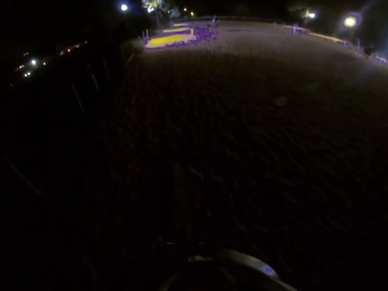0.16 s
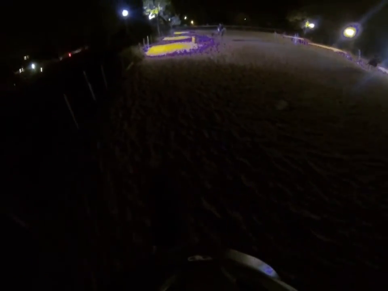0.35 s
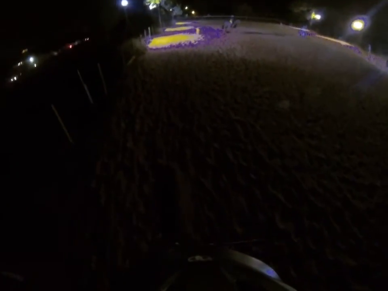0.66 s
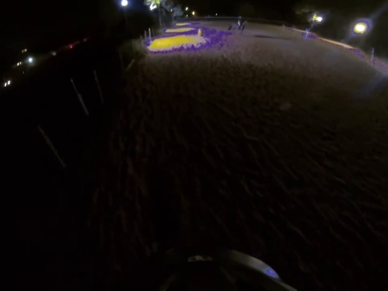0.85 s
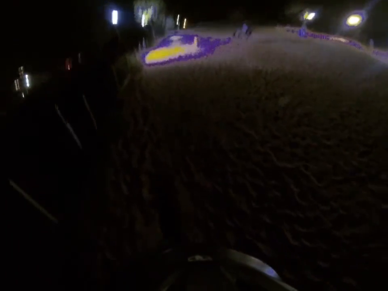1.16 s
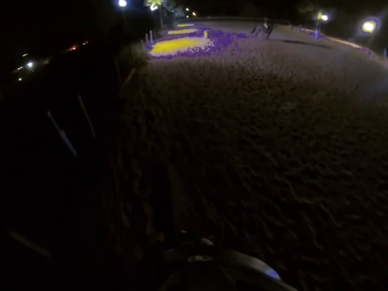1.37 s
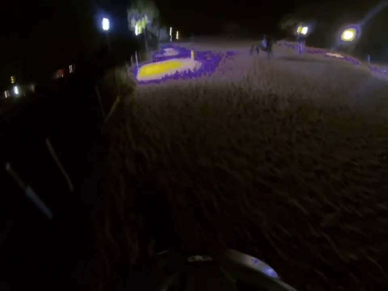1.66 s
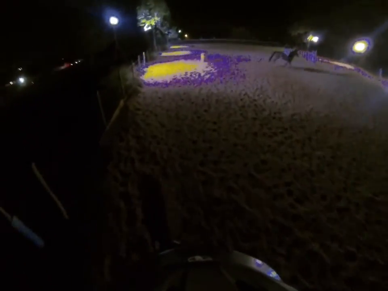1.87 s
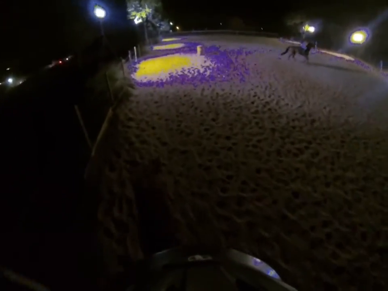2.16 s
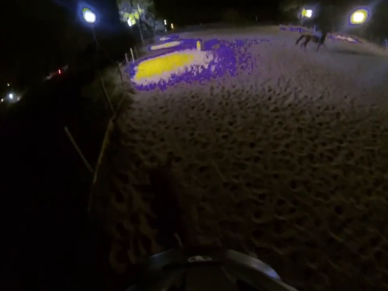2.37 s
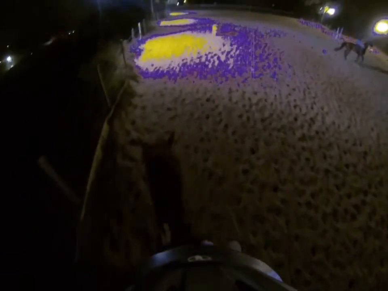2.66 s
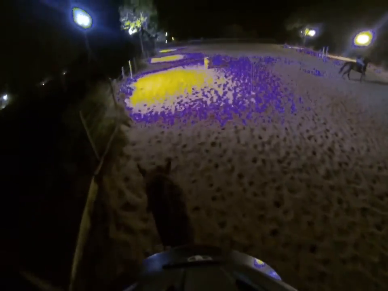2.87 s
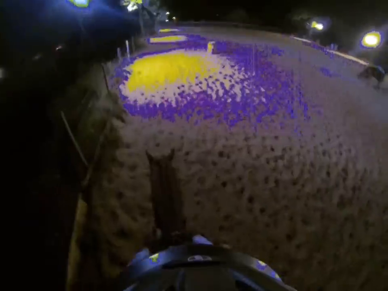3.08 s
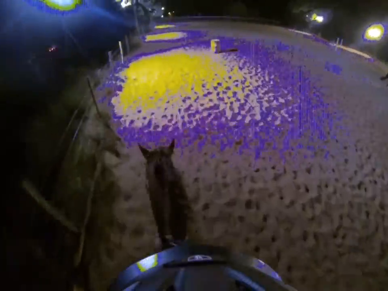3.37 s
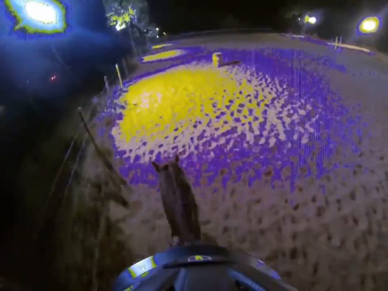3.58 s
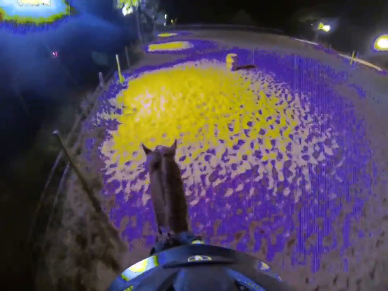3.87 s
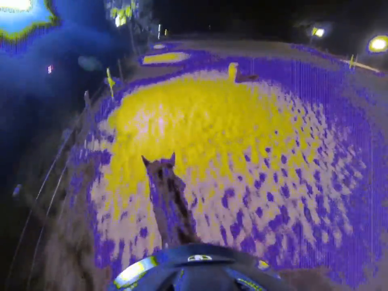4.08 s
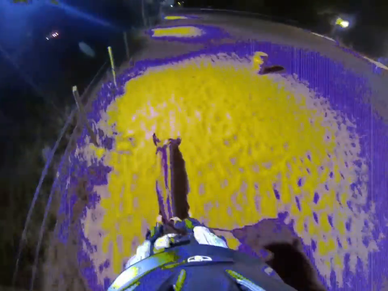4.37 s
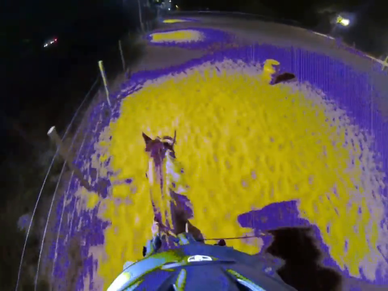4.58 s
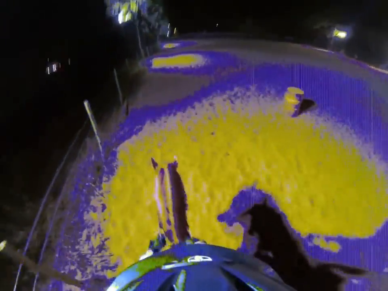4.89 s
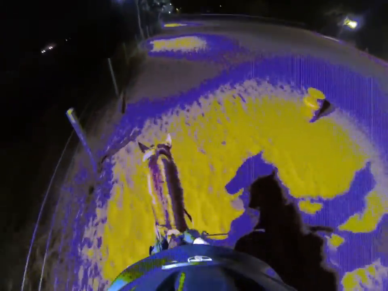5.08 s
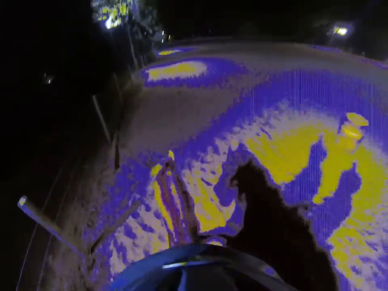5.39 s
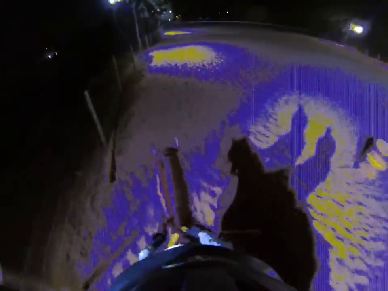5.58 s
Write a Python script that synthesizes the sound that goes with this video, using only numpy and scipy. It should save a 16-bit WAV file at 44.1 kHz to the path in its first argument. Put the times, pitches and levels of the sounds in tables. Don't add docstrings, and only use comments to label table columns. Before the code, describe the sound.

Deep muffled thumps of a horse's strides jolt a helmet-mounted camera housing, over low hiss, dull rubbing and a few tiny tack ticks.

```python
import sys
import numpy as np
from scipy import signal
from scipy.fft import rfft, irfft
from scipy.io import wavfile
from scipy.ndimage import uniform_filter1d

SR = 44100
rng = np.random.default_rng(int(sys.argv[2]) if len(sys.argv) > 2 else 0)


def voltage_ratio(decibels):
    exponent = np.asarray(decibels, float) / 20
    return 10 ** exponent


def put_to_file(sound):
    columns = np.atleast_2d(sound).T
    safe = np.clip(columns, -1, 1)
    whole_steps = np.round(safe * 32767)
    wavfile.write(sys.argv[1], SR, whole_steps.astype(np.int16))


N = 253134
T = np.arange(N) / SR

# peak_s, peak_db, push_ms, sharp_edge_db, rebound_db (last two relative)
LANDINGS = [
    (0.357, -.9, 7.8, -23, -15.5),
    (.9666, -2.4, 8.3, -36, -18),
    (2.2014, -2.0, 7.6, -24, -15.5),
    (2.8545, -8.5, 8.5, -20, -24),
    (3.409, -5.8, 8, -17, -15.5),
    (4.633, -2.5, 7.8, -18, -15.5),
    (5.2433, -2.8, 7.5, -14, -15.5),
    (1.575, -.6, 7.13, -22, -17),
    (4.0243, 4.8, 5.8, -26, -17),
]
# peak_s, peak_db, push_ms, direction (+1 or -1)
NODS = [(0.527, -24, 12.5, 1), (1.141, -17.5, 11, 1), (1.4, -23.5, 8.8, -1), (1.73, -21, 11.4, 1),
        (2.128, -19.5, 6.3, -1), (2.318, -15.5, 10.1, -1), (2.786, -14, 8.7, 1), (2.8, -13, 8.2, -1),
        (2.926, -12, 8.5, -1), (3.078, -17, 9.3, -1), (3.372, -20.5, 8.8, -1), (3.487, -13, 9.8, 1),
        (3.978, -18.5, 6.7, 1), (4.182, -21, 10.8, 1), (4.695, -20.5, 7.2, -1), (4.782, -14.5, 9.8, -1),
        (5.191, -18, 8.3, 1), (5.286, -9.5, 9.1, -1)]
# peak_s, peak_db, push_ms
HARD_STOP = (4.0243, -11, 1.45)
# pitch_hz, t60_s, share (the shell moves against the arm)
MOUNT_MODES = [
    (42.44, 0.23, 0.98),
    (20, 0.15, 0.13),
    (57.2, 0.027, -1.98),
]
# start_s, peak_db, pitch_hz, upper_partial_db
TICKS = [(1.3807, -42.5, 2500, -15), (1.6004, -48, 2170, -9), (1.6074, -52, 2150, -14),
         (2.1156, -41.5, 2540, -12), (2.126, -49, 2560, -13), (2.3565, -39, 2850, -13),
         (2.3654, -48, 2580, -11), (2.7798, -44.5, 2460, -6), (2.786, -47, 2420, 1), (2.792, -48, 2450, -3),
         (3.3634, -46, 2310, -13), (3.3687, -40, 2310, -13), (3.9575, -49, 2300, -17),
         (3.97, -51, 2530, -12), (4.6159, -43, 2470, -14), (4.6274, -49, 2720, -11),
         (4.8489, -42, 1970, -22), (5.1704, -53, 2350, -20), (5.1745, -37, 2330, -21)]
# start_s, peak_db, pitch_hz, second_mode_hz
THUDS = [
    (.345, -52, 460, 995),
    (.865, -52, 254, 500),
    (2.09, -48, 246, 465),
    (2.192, -44, 1010, 440),
    (2.7, -48, 270, 482),
    (2.895, -49, 940, 1610),
    (2.955, -49, 940, 1620),
    (3.93, -46.5, 270, 450),
    (4.62, -51, 492, 1050),
    (5.225, -49, 310, 717),
]
# strongest_s, rub_db, hum_db, sway_db
SLIPS = [(0.0, -62, -58, -41.5), (0.358, -59, -46.5, -38), (.64, -65, -68, -40.5), (.97, -57.5, -56, -37),
         (1.57, -58, -48, -29.5), (1.83, -70, -56, -35), (2.2, -56, -53.5, -27), (2.8, -59.5, -54.5, -28),
         (2.9, -55, -53.5, -34), (3.4, -56, -50.5, -29), (4.0, -59, -51.5, -34), (4.462, -67, -64, -36),
         (4.63, -56.5, -51.5, -31), (5.27, -61, -51, -31.5), (5.67, -67, -68, -54)]
# pitch_hz, width_hz, level_db
RUB_MODES = [
    (1033.4, 67, -1),
    (724, 120, -6.5),
    (1470, 345, -8.5),
    (2170, 275, -8),
]
# pitch_hz, width_hz, level_db
HUM_MODES = [
    (270, 55, 2),
    (446, 93, -3),
    (142, 63, 2.5),
]
# pitch_hz, level_db (per Hz)
HISS_COLOUR = [(30, -21.5), (60, 14), (110, 9), (200, 1.5), (500, -3), (1300, -4.5), (2500, -7),
               (5500, -12), (8000, -15.5), (12000, -22), (14000, -24), (15200, -30), (15700, -43.5)]
# pitch_hz, level_db, on_frame, off_frame (both as a fraction of the frame, 0-1)
WHINE = [
    (6480, -68, 0.32, 0.73),
    (12912, -69, 0.24, .67),
]
# start_s, cut_db, fall_ms
GAIN_CUTS = [
    (.376, 1.6, .5),
    (1.592, 2.8, .44),
    (4.024, 5.6, .45),
    (4.041, .45, .05),
    (4.0535, .65, .05),
    (5.2612, .25, .4),
]
BASS_LIMITS_DB = (-32, -16, -7)


def unit(x):
    return x / np.sqrt(np.mean(x ** 2))


def band(x, hz, width):
    return signal.lfilter(*signal.iirpeak(hz, hz / width, SR), x)


def narrow(x, hz, width):
    return band(band(x, hz, width), hz, 2 * width)


def walk(rate):
    hold = int(SR / rate)
    levels = np.repeat(rng.standard_normal(N // 200), hold)[:N]
    return unit(uniform_filter1d(uniform_filter1d(levels, hold), hold))


def add(out, s, x):
    i = int(s * SR)
    out[i:i + len(x)] += x[:N - i]


def shake(push_ms):
    t = T[:SR // 2]
    ring = np.zeros(len(t))
    for hz, t60, share in MOUNT_MODES:
        ring += share * np.exp(-np.log(1000) * t / t60) * np.sin(2 * np.pi * hz * t)
    push = np.exp(-0.5 * ((t[:SR // 10] - 1 / 20) * 1000 / push_ms) ** 2)
    moved = signal.fftconvolve(push, ring)
    low_cut = signal.butter(2, 10.7, "hp", fs=SR, output="sos")
    moved = signal.sosfilt(low_cut, moved)
    return moved / np.abs(moved).max()


def jolts():
    edge_ms, rebound_s, rebound_ms = 3, 0.0576, 10.8
    lead_s = 1 / 20
    out = np.zeros(N)
    for s, db, ms, edge_db, rebound_db in LANDINGS:
        add(out, s - lead_s, voltage_ratio(db) * shake(ms))
        add(out, s - lead_s, voltage_ratio(db + edge_db) * shake(edge_ms))
        add(out, s + rebound_s - lead_s, voltage_ratio(db + rebound_db) * shake(rebound_ms))
    for s, db, ms, direction in NODS:
        add(out, s - lead_s, direction * voltage_ratio(db) * shake(ms))
    stop_s, stop_db, stop_ms = HARD_STOP
    return out + voltage_ratio(stop_db) * np.exp(-0.5 * ((T - stop_s) * 1000 / stop_ms) ** 2)


def strike(hz, upper_hz, upper_db, t60):
    t = T[:SR // 5]
    scrape, phases = rng.standard_normal(len(t)), rng.random(4)
    modes = [(hz, 1), (0.87 * hz, 0.42), (1.13 * hz, 0.2), (upper_hz, voltage_ratio(upper_db))]
    ring = np.zeros(len(t))
    for (f, share), phase in zip(modes, phases):
        rough = 0.45 * unit(narrow(scrape, f, 0.14 * f))
        ring += share * (np.sin(2 * np.pi * (f * t + phase)) + rough)
    ring *= (1 - np.exp(-t / (0.059 * t60))) * np.exp(-np.log(1000) * t / t60)
    return ring / np.abs(ring).max()


def tack():
    out = np.zeros(N)
    trim_db, early_s = 0.66, 0.001
    for s, db, hz, upper_db in TICKS:
        add(out, s - early_s, voltage_ratio(db + trim_db) * strike(hz, 4850, upper_db, t60=0.024))
    for s, db, hz, second_hz in THUDS:
        t60 = 0.12 * (260 / hz) ** 0.65
        add(out, s - early_s, voltage_ratio(db + trim_db) * strike(hz, second_hz, -10.5, t60))
    return out


def slips(peak_db, rest_db, rise_db_s, fade_db_s, wobble_db, lag_s=0):
    since = T - np.array(SLIPS)[:, :1] - lag_s
    ramps = voltage_ratio(peak_db[:, None] + np.where(since < 0, rise_db_s * since, -fade_db_s * since))
    rest = voltage_ratio(rest_db + wobble_db * walk(14))
    return np.sqrt(rest ** 2 + np.sum(ramps ** 2, axis=0))


def shell():
    _, rub_db, hum_db, sway_db = np.transpose(SLIPS)
    grit = rng.standard_normal(N) * voltage_ratio(2.0 * walk(90))
    rub = unit(sum(voltage_ratio(db) * narrow(grit, hz, width) for hz, width, db in RUB_MODES))
    dull = rng.standard_normal(N) * voltage_ratio(1.7 * walk(25))
    hum = unit(sum(voltage_ratio(db) * narrow(dull, hz, width) for hz, width, db in HUM_MODES))
    slow = signal.sosfilt(signal.butter(4, 48, fs=SR, output="sos"), rng.standard_normal(N))
    sway = unit(band(slow, 20, 72) + 0.16 * band(slow, 41.7, 6))
    sway += voltage_ratio(-22) * unit(narrow(dull, 81.4, 37))
    out = slips(rub_db, rest_db=-67.5, rise_db_s=132, fade_db_s=76.5, wobble_db=2) * rub
    out += slips(hum_db, rest_db=-64, rise_db_s=334.5, fade_db_s=209.5, wobble_db=3.5) * hum
    out += slips(sway_db, rest_db=-42, rise_db_s=148, fade_db_s=60, wobble_db=4, lag_s=0.041) * sway
    return out


def electronics():
    hiss_db, frame_hz = -53.5, 48.015
    hz, db = np.transpose(HISS_COLOUR)
    colour = voltage_ratio(np.interp(np.log(np.fft.rfftfreq(N, 1 / SR) + 1), np.log(hz), db))
    out = voltage_ratio(hiss_db) * unit(irfft(rfft(rng.standard_normal(N)) * colour, N))
    frame, place = np.divmod(T * frame_hz, 1)
    for hz, db, on, off in WHINE:
        phase = rng.random(int(frame[-1]) + 1)[frame.astype(int)]
        gate = uniform_filter1d(1.0 * ((place > on) & (place < off)), size=30)
        tone = np.sqrt(2) * np.sin(2 * np.pi * (hz * T + phase))
        out += voltage_ratio(db + 1.3 * walk(40)) * gate * tone
    return out


def scene():
    return (jolts() + tack() + shell() + electronics())[None]


def starve(x, cut_db):
    top_hz, starved_hz, floor_hz, ragged_hz = 15250, 13400, 13150, 420
    hushed_db = 5
    start_db, gone_db, burst_db = BASS_LIMITS_DB
    hz, at, frames = signal.stft(x, SR, nperseg=1024)
    bass_db = 10 * np.log10(2 * np.sum(np.abs(frames) ** 2, axis=1) + 1e-12)
    need = np.interp(uniform_filter1d(bass_db, size=5, origin=2), [start_db, gone_db], [0, 1])
    need = np.minimum(need + np.interp(at, T, cut_db) / hushed_db, 1)
    flicker = rng.uniform(0.2, 1.2, len(need[0]))
    edge_hz = top_hz - need * flicker * (top_hz - starved_hz)
    edge_hz = np.where(bass_db > burst_db, SR, edge_hz)
    patches = rng.standard_normal((129, frames.shape[2] // 2 + 1))
    patches = np.repeat(np.repeat(patches, 4, 0), 2, 1)[:len(hz), :frames.shape[2]]
    ragged = ragged_hz * np.abs(patches) * (0.4 + need)
    kept = hz[:, None] < np.maximum(edge_hz - ragged, floor_hz)
    return signal.istft(frames * kept, SR, nperseg=1024)[1][:, :N]


def band_limit(x):
    return signal.sosfilt(signal.butter(12, 15700, fs=SR, output="sos"), x)


def record(dry):
    recover_db_s, ceiling = 14, 1
    cut_db, left_db, last_s = np.zeros(N), 0, 0
    for s, db, ms in GAIN_CUTS:
        left_db = max(left_db - recover_db_s * (s - last_s), 0) + db
        last_s = s
        since = T[T >= s] - s
        falling = db * np.exp(-since * 1000 / ms)
        cut_db[T >= s] = np.maximum(left_db - falling - recover_db_s * since, 0)
    clipped = np.clip(dry * voltage_ratio(-cut_db), -ceiling, ceiling)
    return band_limit(starve(clipped, cut_db))


dry = scene()
out = record(dry)
put_to_file(out)
```